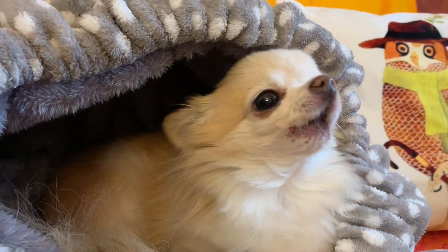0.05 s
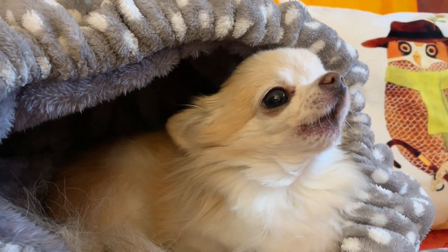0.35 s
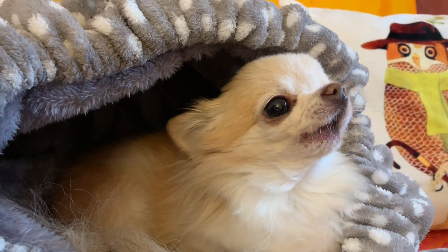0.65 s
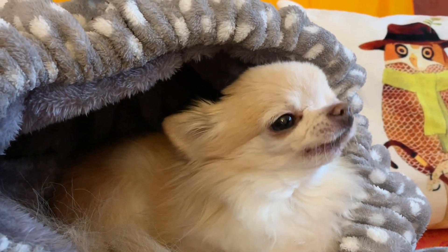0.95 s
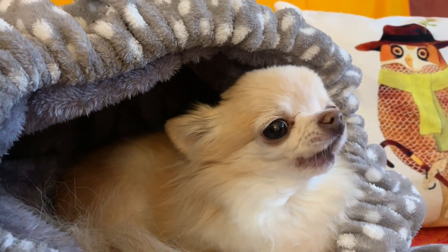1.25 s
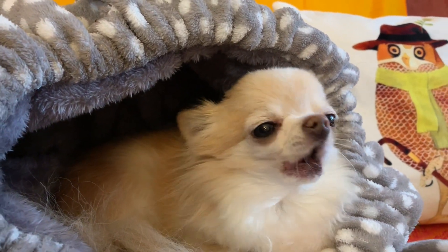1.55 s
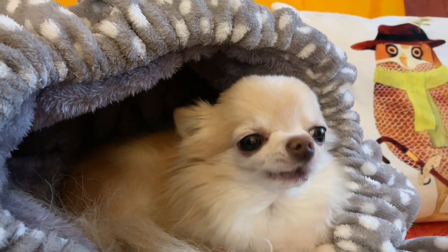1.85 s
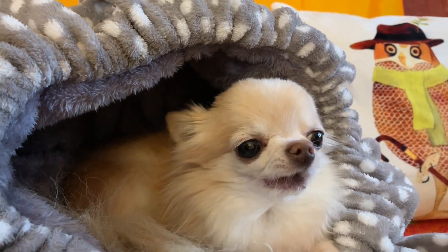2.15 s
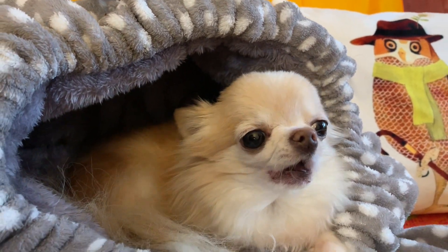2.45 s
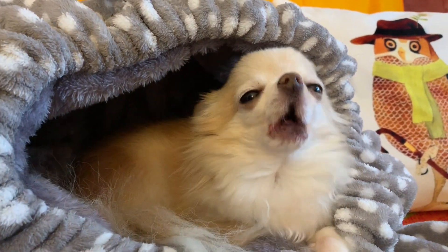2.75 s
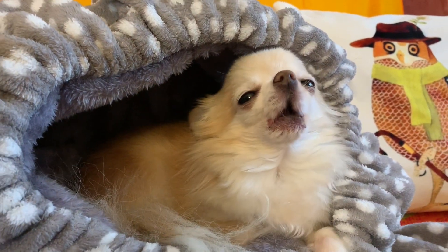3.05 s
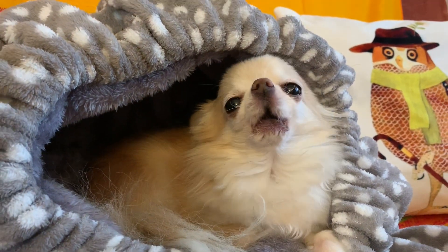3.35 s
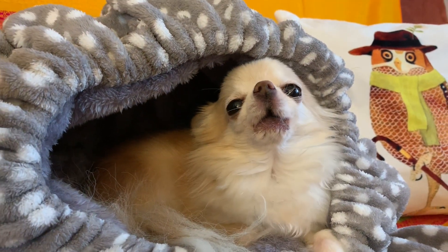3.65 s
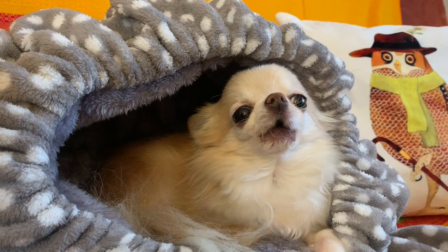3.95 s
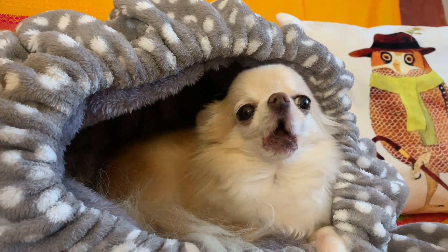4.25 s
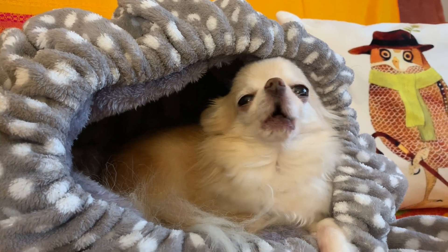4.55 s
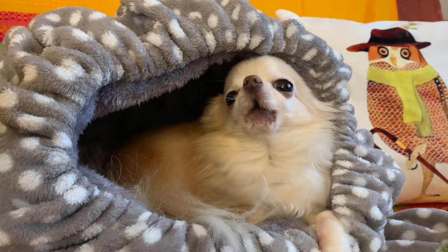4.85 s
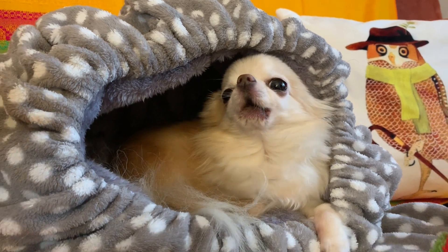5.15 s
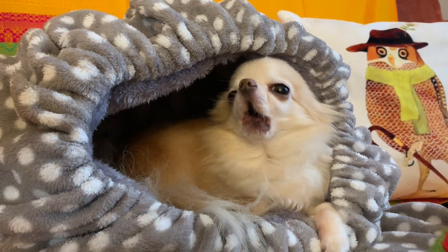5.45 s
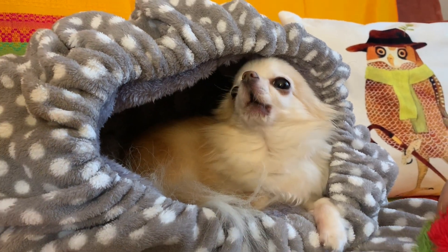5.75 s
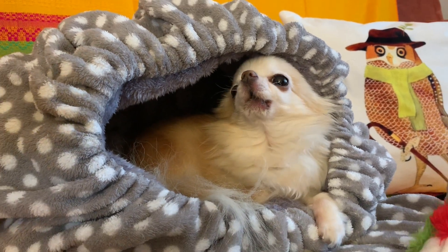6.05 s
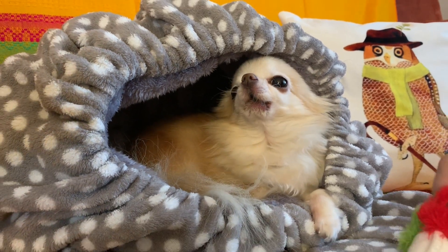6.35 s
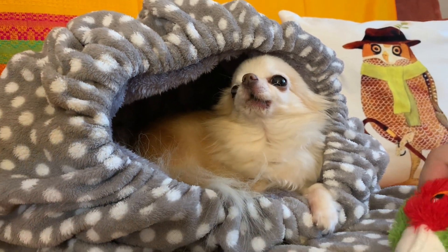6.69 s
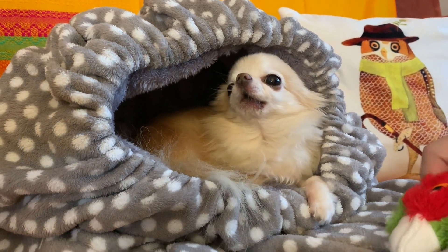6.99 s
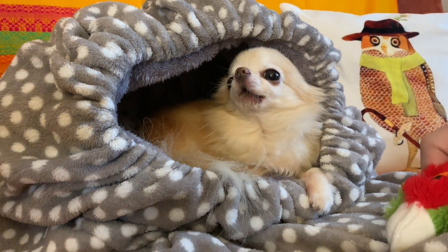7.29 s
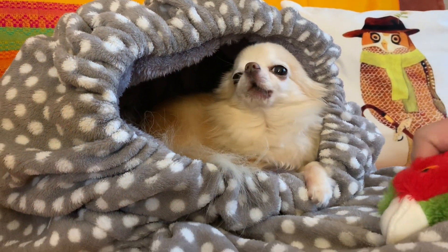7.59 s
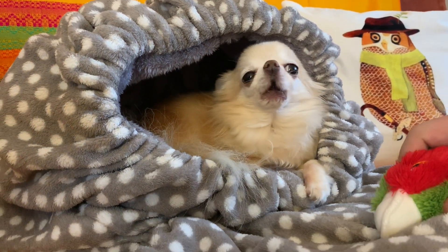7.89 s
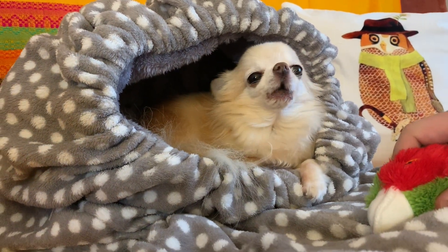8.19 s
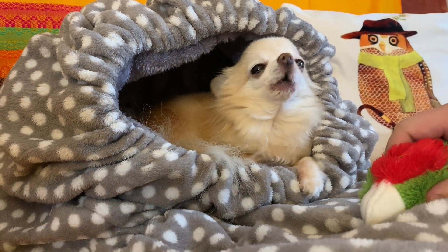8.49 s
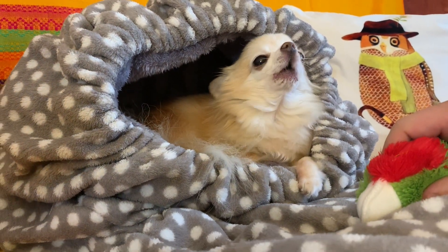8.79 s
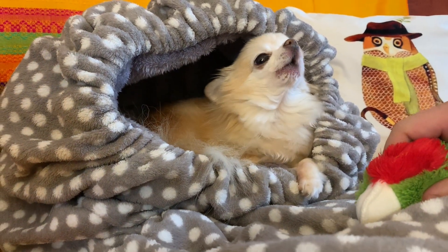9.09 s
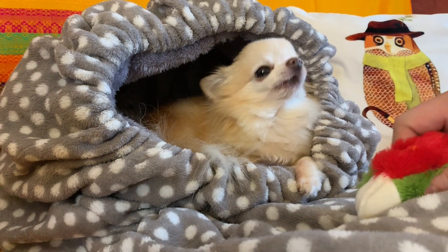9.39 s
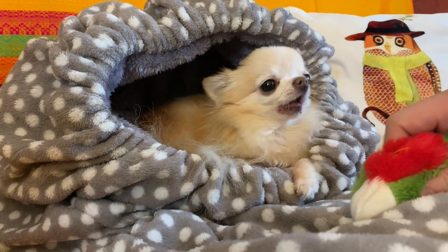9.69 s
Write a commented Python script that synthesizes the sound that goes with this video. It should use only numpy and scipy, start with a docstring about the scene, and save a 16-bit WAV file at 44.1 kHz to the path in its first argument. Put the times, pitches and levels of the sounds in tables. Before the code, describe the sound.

A small dog whimpers softly and creakily, close by in a quiet room, with a lip smack and brief yip at 0.7 seconds. A squeaky toy is pumped from 1.1 to 2.6 seconds, about four squeezes a second, each reedy squeak followed by a slightly higher one as it refills. More runs come at 4.1 to 4.8, 5.3 to 5.7, 6.2 to 7.7 and 9.3 to 9.8 seconds.

Louder than the toy, the dog howls at about 1.3, 2.5, 4.2, 5.4 and 7.5 seconds. Each high, sliding howl breaks out of a hoarse bark; the first three briefly crack upward. The second, fourth and last sink into creaky moans, the last fading by 9 seconds. Whines come at 6.5 and 9.7 seconds, with faint nasal grumbles and lip smacks between calls. The sound is stereo, with a short room tail over a low hush.

```python
"""A small dog howls in a furnished room while a hand pumps a squeaky toy beside it.
Each howl breaks out of a hoarse bark; its vocal folds flip register or sink into a creaky moan,
and the opening mouth brightens the tone. Whines, nasal grumbles and lip smacks fall in between.
The toy's reed squeaks low as it is squeezed and higher as it refills with air.
Both sit close up in stereo, with a short room tail over a low hush."""
import sys
import numpy as np
from scipy import signal
from scipy.fft import rfft, irfft, next_fast_len
from scipy.io import wavfile
from scipy.ndimage import uniform_filter1d

SR = 44100
rng = np.random.default_rng(int(sys.argv[2]) if len(sys.argv) > 2 else 0)


def generate_wav(signal):
    """Clip the signal to [-1, 1] and save it as 16-bit WAV at the path in sys.argv[1]."""
    frames = np.transpose(np.atleast_2d(signal))
    scaled = np.clip(frames, -1, 1) * 32767
    pcm = np.round(scaled).astype(np.int16)
    wavfile.write(sys.argv[1], SR, pcm)


N = 433503

# room tone: (frequency [Hz], level [dB])
HUSH_EQ = [(20, -3), (130, -3.5), (220, -15), (600, -30), (2000, -25.5), (7000, -55.5), (16000, -68.5)]
# reverb decay: (frequency [Hz], time to fall 60 dB [s])
ROOM_DECAY = [(1200, 0.3), (5000, 0.27), (14000, 0.078)]
# stereo phase of each source, narrowed in the bass: (frequency [Hz], left lead [rad])
TOY_PHASE = [(0, 5.5), (780, -0.2), (1030, -2.5), (1460, -2.5), (3620, -8), (4130, -8), (5080, -4.5),
             (6630, -6.5), (9130, -4.5), (11800, -2.5), (14000, -1.9), (16400, 3)]
DOG_PHASE = [(50, -5), (750, 0.75), (1200, 0.76), (1750, -3), (2000, -2), (2500, -2), (3600, -5),
             (5100, -5.5), (6100, -21), (7700, -4.5), (10500, -2.5), (12000, -2.5), (15000, 0.5)]
# stereo balance of each source: (frequency [Hz], left minus right [dB])
TOY_PAN = [(4400, -3.5), (8000, -0.5)]
DOG_PAN = [(300, 0), (700, 0), (1300, -10.5), (2400, -2.5), (4400, 0)]

# the reed's tone, and its extra colour when air is sucked in: (frequency [Hz], gain [dB])
REED_EQ = [(1250, -7), (2500, -11.5), (3700, -9.5), (4700, -14), (6200, -7.5), (6900, -10.5), (7500, -8),
           (8250, -6.5), (8800, -1.5), (10000, -4.5), (11200, -10.5), (12500, -4.5), (13800, -17.5),
           (15000, -17)]
REFILL_EQ = [(1400, 4.5), (2800, 2), (4200, -1), (5600, 1.5), (7000, -5), (8400, -10), (9800, -0.5),
             (13500, 0.5)]
# the hand squeezes the toy: (time [s], length [s], pitch [Hz], level [dB])
SQUEEZES = [(1.139, 0.052, 1645, -25.5), (1.403, .068, 1400, -32), (1.678, 0.078, 1266, -37.5),
            (1.939, 0.044, 1211, -34), (2.184, 0.042, 1225, -33.5), (2.398, 0.056, 1274, -31),
            (4.06, 0.065, 1235, -33), (4.31, 0.049, 1272, -29.5), (4.602, 0.07, 1241, -33.5),
            (5.3, 0.054, 1240, -34), (5.527, .04, 1343, -37), (6.28, .049, 1230, -33),
            (6.536, 0.058, 1246, -33), (6.81, 0.052, 1235, -32.5), (7.049, 0.052, 1236, -33),
            (7.278, 0.052, 1263, -31.5), (7.507, .055, 1258, -28.5), (9.321, 0.053, 1266, -32.5),
            (9.587, 0.038, 1264, -31)]
# the toy springs back: (time [s], pitch [Hz])
REFILLS = [(1.294, 1445), (1.555, 1437), (1.822, 1395), (2.065, 1388), (2.312, 1367), (2.54, 1421),
           (4.213, 1406), (4.465, 1405), (4.757, 1403), (5.429, 1417), (5.665, 1390), (6.185, 1371),
           (6.427, 1397), (6.686, 1393), (6.958, 1385), (7.193, 1381), (7.415, 1395), (7.645, 1393),
           (9.48, 1371), (9.74, 1410)]

# resonances of the dog's lips, nose, and throat with muzzle: (frequency [Hz], gain [dB])
LIPS_EQ = [(100, -4), (350, 7.5), (1300, 7), (2600, -2), (14000, -32)]
NOSE_EQ = [(100, -6), (250, 2), (450, -20), (700, -15.5), (1300, -21), (2200, -21.5), (4500, -9),
           (10000, -22)]
THROAT_EQ = [(120, -40), (300, -15.5), (600, -11.5), (900, -3.5), (1200, 4), (1450, 15), (1800, -5),
             (2200, -7.5), (2500, -14), (2900, -14.5), (3500, -14.5), (4800, -26.5), (5700, -33),
             (7700, -15.5), (9800, -59.5), (12500, -38), (15000, -37)]
# breath leaking through the folds: (frequency [Hz], gain [dB])
BREATH_EQ = [(1000, -33), (3000, -24), (7000, -15), (13000, -11)]
# highs of an open mouth, lows of a soft moan: (frequency [Hz], boost [dB per dB of lift or softness])
OPEN_TILT = [(1500, 0.013), (3200, 1.175), (13000, 1.46)]
SOFT_TILT = [(650, 0.89), (1200, 0.069)]
# smacks of lips and tongue: (time [s], peak level [dB])
SMACKS = [(0.703, -37), (3.947, -48.5), (5.112, -46), (9.149, -52)]
# closed-mouth grumbles, one curve each: (time [s], pitch [Hz], level [dB])
GRUMBLES = [
    [(2.21, 246.6, -45), (2.225, 218, -48), (2.26, 176, -46.5), (2.295, 126.4, -48), (2.33, 141.7, -41),
     (2.375, 132.2, -42.5), (2.4, 173, -53.5), (2.47, 162, -72)],
    [(9.473, 350, -51), (9.5, 374, -44), (9.525, 323, -60)],
]
# whines and yips, one curve each: (time [s], pitch [Hz], effort [dB])
WHINES = [
    [(0, 442.6, -32.5), (.04, 376.6, -39.5), (.06, 329, -64), (.16, 603, -57.5)],
    [(.21, 592, -55), (.3, 554, -61.5), (.43, 461, -56), (.47, 442, -72), (.62, 545, -63.5)],
    [(.71, 541, -55), (.725, 571, -22.5), (.752, 505, -30.5)],
    [(6.455, 600, -40), (6.497, 754, -23.5), (6.59, 694.5, -20), (6.72, 623, -38.5), (6.75, 488, -47)],
    [(9.68, 544, -41.5), (9.72, 587, -31.5), (9.762, 635, -22), (9.79, 564, -25.5), (9.83, 586, -30)],
]
# mouth opening for each whine: (treble lift [dB])
WHINE_LIFTS = [-7.5, -6.5, 0, 1, 8.5]
# the voice flips up a fourth into head register and drops back: (time [s], length [s])
REGISTER_FLIPS = [(1.522, 0.081), (2.712, 0.12), (4.442, 0.06), (6.505, 0.089)]
# slack folds: (start [s], end [s], start roughness [0-1], end roughness [0-1], subharmonics [0-1])
CREAKS = [(0, .45, .55, .5, .3), (3.655, 3.87, .5, .55, .8), (6.185, 6.46, .4, .12, .6),
          (8.14, 9.05, .1, .5, .22)]
# the bark that opens each howl: (time [s], attack [s], hoarse from [s], length [s],
# first pitch [Hz], top pitch [Hz], effort [dB], roughness [0-1])
BARKS = [(1.271, 0.013, 1.303, 0.098, 573.4, 753.7, -17, 0.83),
         (2.534, .02, 2.54, 0.11, 448.9, 895, -19, 0.77),
         (4.206, 0.019, 4.22, 0.098, 422.3, 793.7, -18, 0.75),
         (5.395, 0.029, 5.42, .115, 438.6, 858, -18, .7), (7.463, 0.036, 6.93, .062, 368, 693.3, -20, .55)]
# the howl after each bark, one curve each: (time [s], pitch [Hz], effort [dB])
HOWLS = [
    [(1.42, 586.6, -20), (1.5, 616.6, -19.5), (1.535, 708, -21.5), (1.61, 686, -16.5), (1.7, 681, -17),
     (1.815, 620.5, -17.5), (1.835, 577, -39)],
    [(2.665, 757, -17.5), (2.88, 811.5, -21), (3.04, 701, -17.5), (3.1, 630.4, -21), (3.44, 589.2, -21.5),
     (3.51, 618.6, -20), (3.58, 600.5, -23), (3.65, 591.6, -33.5), (3.78, 465, -39.5), (3.845, 459, -48.5)],
    [(4.33, 570.6, -22), (4.44, 720.3, -17.5), (4.51, 687.4, -18), (4.66, 716.3, -17), (4.74, 691.4, -20.5),
     (4.8, 771, -20), (4.89, 677, -22.5), (4.95, 665.6, -32), (5.005, 638, -32), (5.025, 575, -43)],
    [(5.54, 687, -18), (5.575, 621.4, -41.5), (5.602, 638.4, -38), (5.618, 705.4, -19), (5.71, 894.5, -19),
     (5.84, 715.6, -23.5), (5.9, 665, -34.5), (5.97, 715.6, -25), (6.03, 652.5, -34), (6.11, 660.5, -33),
     (6.22, 541.4, -43.5), (6.44, 598, -38)],
    [(7.55, 530, -17), (7.58, 539.7, -53.5), (7.63, 533, -48), (7.652, 657, -20), (7.78, 827, -23),
     (7.95, 793, -23.5), (8.03, 689.7, -22.5), (8.29, 604, -32.5), (8.375, 711, -25), (8.45, 626.6, -31.5),
     (8.62, 579, -43.5), (8.9, 582, -42.5), (9.01, 482, -46)],
]

HUSH_DB, HIGH_CUT_HZ = -66.5, 15950
# early squeezes build pressure slowly and scoop up from further below (share of the pitch)
FIRST_SCOOP, LATER_SCOOP, WARM_UP_S = 0.26, .026, 0.49
SQUEAK_PEAK, PEAK_PER_SCOOP, SWELL_PER_SCOOP = .36, 1.1, 3.4  # slow squeezes peak later, start softer
REFILL_S, REFILL_HZ, REFILL_DB, REFILL_DB_PER_HZ = 0.042, 1400, -34, 0.18  # harder: higher and louder
ONSET_DB, RELEASE_S, RELEASE_DB, RELEASE_SAG = -24, 0.016, -20.5, 0.36
WAVER_DB, WAVER_HZ, ROUGH_WAVER_DB = 0.66, 36, 2.5  # a held note wavers, a rough one more so
OPEN_DB, SHUT_DB, OPEN_S, HOLD_S, CLOSE_S = 7, -5, .03, 0.35, 0.25  # the mouth's treble-lift envelope
LIFT_PER_EFFORT = 0.11  # the jaw closes as effort falls, dB per dB
MUZZLE_HZ, MUZZLE_HZ_PER_DB, MUZZLE_WIDTH_HZ, MUZZLE_DB = 3820, 94, 390, 6.5  # sweeps up with the lift
FLIP_RATIO, FLIP_PEAK, FLIP_SAG = 1.335, .4, .4  # pitch arch: top, its place in the flip, droop
FLIP_RISE_S, FLIP_DROP_S, FLIP_DB = 0.017, .008, -1
CLEAN_ROUGHNESS, BARK_SUBHARMONICS, CLEAR_S = .015, .2, .018


def amp(db):
    """Decibels to gain."""
    return 10 ** (np.asarray(db) / 20)


def unit_rms(x):
    """Normalises to unit rms."""
    return x / np.sqrt(np.mean(x ** 2) + 1e-20)


def curve(points, hz):
    """A table's value at hz, in straight lines over log frequency."""
    f, value = np.transpose(points)
    return np.interp(np.log(hz + 1), np.log(f + 1), value)


def add(mix, s, sound):
    """Drops a sound into the mix at s seconds."""
    part = mix[max(round(s * SR), 0):][:len(sound)]
    part += sound[:len(part)]


def filtered(x, gain):
    """Filters x by a gain that is a function of frequency."""
    size = next_fast_len(len(x) + 4096)
    return irfft(rfft(x, size) * gain(np.fft.rfftfreq(size, 1 / SR)), size)[..., :len(x)]


def eq(x, points):
    """Shapes x with an EQ table."""
    return filtered(x, lambda hz: amp(curve(points, hz)))


def wobble(size, rate_hz):
    """A smooth random modulator of unit rms, up to the given rate."""
    return unit_rms(filtered(rng.standard_normal(size), lambda hz: 1 / (1 + (hz / rate_hz) ** 4)))


def levelled(x):
    """Rides the gain to a constant level and fades the ends."""
    power = abs(uniform_filter1d(uniform_filter1d(x ** 2, 500), 500))
    return x / np.sqrt(power + 1e-12) * signal.windows.tukey(len(x), 300 / len(x))


def pulses(hz, offset=0):
    """A pulse train built from harmonics; an offset of a half gives the subharmonics between them."""
    phase = np.float32(2 * np.pi * (np.cumsum(hz) / SR % 2))
    return unit_rms(sum(np.cos((k - offset) * phase) * (k * hz < HIGH_CUT_HZ) for k in range(1, 29)))


def hush():
    """The low tone of a quiet room, almost mono."""
    mid, side = (unit_rms(eq(rng.standard_normal(N), HUSH_EQ)) for _ in range(2))
    return amp(HUSH_DB) * np.array([mid + .15 * side, mid - .15 * side])


def reverb(x, wet_db):
    """A short tail of scattered reflections, the highs dying first."""
    size = SR // 2
    taps = rng.standard_normal(size) * (rng.random(size) < 3000 / SR)
    taps *= np.arange(size) > 200  # pre-delay
    hz, t, bands = signal.stft(taps, SR, nperseg=256)
    decay = amp(-60 * t / curve(ROOM_DECAY, hz)[:, None])
    tail = signal.istft(bands * decay, SR, nperseg=256)[1]
    return amp(wet_db) * signal.fftconvolve(x, tail / np.linalg.norm(tail))[:N]


def place(x, phase, pan, wet_db):
    """A source reaches left and right with its own phase, level and reflections."""
    def gains(hz):
        lead = curve(phase, hz) * np.minimum(hz / 700, 1) ** 2  # long waves arrive in step
        pair = amp(np.outer([.5, -.5], curve(pan, hz))) * np.exp(1j * np.outer([.5, -.5], lead))
        return pair / np.sqrt(np.mean(abs(pair) ** 2, axis=0))
    panned = filtered(x + reverb(x, wet_db), gains)
    return panned + np.array([reverb(x, wet_db), reverb(x, wet_db)]) / 2


def squeak(s, length, pitch_hz, level_db):
    """The toy's reed snaps into a buzz, rises with the pressure, then sags and stalls."""
    t = np.arange(0, length, 1 / SR)
    progress = t / length
    scoop = np.interp(s - SQUEEZES[0][0], [0, WARM_UP_S], [FIRST_SCOOP, LATER_SCOOP])
    peak = min(SQUEAK_PEAK + PEAK_PER_SCOOP * scoop, .9)
    rise = np.clip(1 - progress / peak, 0, 1)
    sag = np.clip((progress - peak) / (1 - peak), 0, 1)
    bend = 1 - scoop * rise ** 2 - 0.055 * sag ** 2 - 0.1 * sag ** 6
    hz = pitch_hz * (bend + .001 * wobble(len(t), 280))
    buzz = eq(pulses(hz) + 0.044 * rng.standard_normal(len(t)), REED_EQ)
    snap = 1 - np.exp(-t / 0.00041)
    pressure = snap * (1 - SWELL_PER_SCOOP * scoop * rise) * (1 - sag ** 4.5)
    return s, amp(level_db + 2.5) * unit_rms(buzz * pressure)


def refill(s, pitch_hz):
    """The toy springs back, always in the same short time, and sucks air through the reed."""
    level_db = REFILL_DB + REFILL_DB_PER_HZ * (pitch_hz - REFILL_HZ)
    s, sound = squeak(s, REFILL_S, pitch_hz, level_db)
    return s, eq(sound, REFILL_EQ)


def smack(s, peak_db):
    """A wet click of lips and tongue, gone in milliseconds."""
    t = np.arange(1500) / SR
    click = eq(rng.standard_normal(len(t)) * np.exp(-t / .003), LIPS_EQ)
    return s, amp(peak_db + 5) * click / abs(click).max()


def grumble(rows):
    """Slow, uneven fold pulses muffled by the nose; the slacker the folds, the more it wheezes."""
    s, pitch, level = np.transpose(rows)
    t = np.arange(s[0], s[-1], 1 / SR)
    hz = np.interp(t, s, pitch) * (1 + 0.04 * wobble(len(t), 70))
    folds = filtered(pulses(hz), lambda f: 1 / (1 + (f / 1800) ** 4))
    wheeze = (150 / hz) ** 2 * rng.standard_normal(len(t))
    return s[0], amp(np.interp(t, s, level)) * levelled(eq(folds + wheeze, NOSE_EQ))


def contour(rows):
    """Time, pitch and effort of one call, with its register flips and drooping release."""
    end, last_hz, last_db = rows[-1]
    release = (end + RELEASE_S, last_hz * (1 - RELEASE_SAG), last_db + RELEASE_DB)
    s, pitch, effort = np.transpose([*rows, release])
    t = np.arange(s[0], s[-1], 1 / SR)
    pitch_hz, effort_db = np.interp(t, s, pitch), np.interp(t, s, effort)
    for start, length in REGISTER_FLIPS:
        age = t - start
        flipped = np.clip(np.minimum(age / FLIP_RISE_S, (length - age) / FLIP_DROP_S), 0, 1)
        droop = FLIP_SAG * (age / length - FLIP_PEAK) ** 2
        pitch_hz *= 1 + flipped * (FLIP_RATIO - 1 - droop)
        effort_db += flipped * FLIP_DB
    return t, pitch_hz, effort_db


def creak(t):
    """Roughness and subharmonics: a catch at the onset, then clean until the folds go slack."""
    rough = CLEAN_ROUGHNESS + .15 * np.exp(-(t - t[0]) / .06)
    sub = np.zeros(len(t))
    for start, end, first, last, strength in CREAKS:
        rough = np.maximum(rough, np.interp(t, [start, end], [first, last], left=0, right=0))
        sub += strength * ((t > start) & (t < end))
    return uniform_filter1d(rough, size=500), uniform_filter1d(sub, size=500)


def throat(drive, t, effort_db, pitch_hz, mouth_db):
    """An opening mouth raises the formants and lets the treble out; a soft moan leans on its lows."""
    hz, frames, bands = signal.stft(drive, SR, nperseg=512, noverlap=384)
    hz, frames = hz[:, None], frames + t[0]
    lift_db = np.interp(frames, t, mouth_db)
    softness = np.clip(-19.5 - np.interp(frames, t, effort_db), 0, 22)
    larynx = (np.interp(frames, t, pitch_hz) / 700) ** 0.2  # rises with pitch, shortening the throat
    formants_db = curve(THROAT_EQ, hz / (larynx * (1 + 0.0088 * lift_db)))
    tilt_db = lift_db * curve(OPEN_TILT, hz) + softness * curve(SOFT_TILT, hz)
    muzzle_hz = MUZZLE_HZ + MUZZLE_HZ_PER_DB * lift_db
    muzzle_db = MUZZLE_DB * np.exp(-((hz - muzzle_hz) / MUZZLE_WIDTH_HZ) ** 2)
    shaped = bands * amp(formants_db + tilt_db + muzzle_db)
    return signal.istft(shaped, SR, nperseg=512, noverlap=384)[1][:len(t)]


def voice(t, pitch_hz, effort_db, lift_db, rough, sub):
    """Vocal folds, clean or chaotic, sound through the throat along with their breath."""
    n = len(t)
    hz = pitch_hz * (1 + .003 * wobble(n, 25) + (.002 + .075 * rough) * wobble(n, 100))
    subharmonics = pulses(hz, .5) * (1 + .5 * wobble(n, 32))  # strong and weak cycles alternate
    folds = pulses(hz) + sub * subharmonics
    leak = amp(np.interp(effort_db, [-42, -23], [10, 0]))  # slack folds leak more as effort fades
    breath = leak * eq(rng.standard_normal(n), BREATH_EQ)
    rasp = rng.standard_normal(n) * (1 + 0.76 * np.cos(np.pi * np.cumsum(hz) / SR))
    drive = (1 - rough) * folds + breath + .35 * rough * rasp
    shudder = 1 + .5 * rough * np.tanh(wobble(n, 110))
    puff = amp(-30) * rough * wobble(n, 520)  # a bark pushes out a low gust of air
    mouth_db = lift_db + LIFT_PER_EFFORT * np.maximum(effort_db - effort_db.max(), -12)
    waver_db = (WAVER_DB + ROUGH_WAVER_DB * rough) * wobble(n, WAVER_HZ)
    tone = levelled(throat(drive, t, effort_db, pitch_hz, mouth_db))
    return amp(effort_db + waver_db) * (tone * shudder + puff)


def whine(rows, lift_db):
    """A short call with no bark, the mouth held nearly still."""
    t, pitch_hz, effort_db = contour(rows)
    return t[0], voice(t, pitch_hz, effort_db, lift_db, *creak(t))


def howl(bark, rows):
    """A hoarse bark shoots up in pitch and clears into a howl; the mouth opens, holds and closes."""
    s, attack, hoarse_s, length, first_hz, top_hz, bark_db, roughness = bark
    t, pitch_hz, effort_db = contour([(s, first_hz, bark_db), (s + length, top_hz, bark_db), *rows])
    age = t - s
    effort_db += ONSET_DB * np.clip(1 - age / attack, 0, 1)
    lift_db = np.interp(age, [0, OPEN_S, HOLD_S, HOLD_S + CLOSE_S], [SHUT_DB, OPEN_DB, OPEN_DB, SHUT_DB])
    clearing = np.exp(-np.maximum(age - length, 0) / CLEAR_S)
    hoarse = uniform_filter1d((t >= hoarse_s) * clearing, size=500)
    rough, sub = creak(t)
    rough = np.maximum(rough, roughness * hoarse)
    return s, voice(t, pitch_hz, effort_db, lift_db, rough, sub + BARK_SUBHARMONICS * hoarse)


def scene():
    """Dog and toy on their own tracks, placed in the room over its hush."""
    dog, toy = np.zeros(N), np.zeros(N)
    for bark, rows in zip(BARKS, HOWLS):
        add(dog, *howl(bark, rows))
    for rows, lift_db in zip(WHINES, WHINE_LIFTS):
        add(dog, *whine(rows, lift_db))
    for rows in GRUMBLES:
        add(dog, *grumble(rows))
    for row in SMACKS:
        add(dog, *smack(*row))
    for row in SQUEEZES:
        add(toy, *squeak(*row))
    for row in REFILLS:
        add(toy, *refill(*row))
    dog = place(dog, DOG_PHASE, DOG_PAN, wet_db=-15.5)
    toy = place(toy, TOY_PHASE, TOY_PAN, wet_db=-12.5)
    return dog + toy + hush()


def record(dry):
    """A soft clip rounds the hottest bark peaks, then a steep high cut trims the top."""
    rounded = dry / (1 + (dry / .47) ** 6) ** (1 / 6)
    high_cut = signal.firwin(511, HIGH_CUT_HZ, window=("kaiser", 9), fs=SR)
    return signal.oaconvolve(rounded, high_cut[None], "same")


dry = scene()
out = record(dry)
generate_wav(out)
```